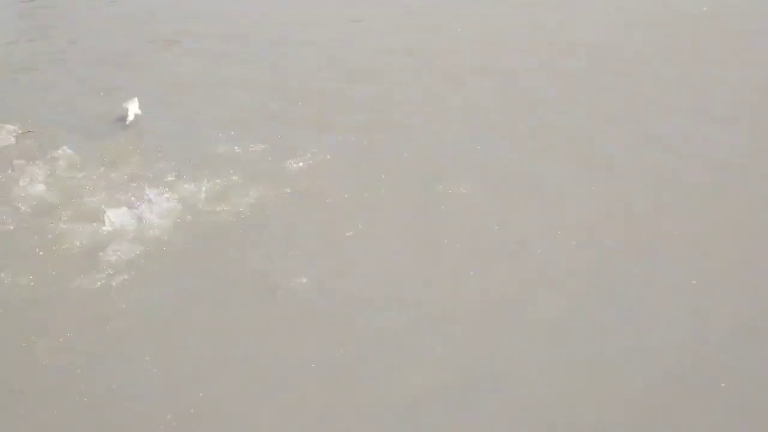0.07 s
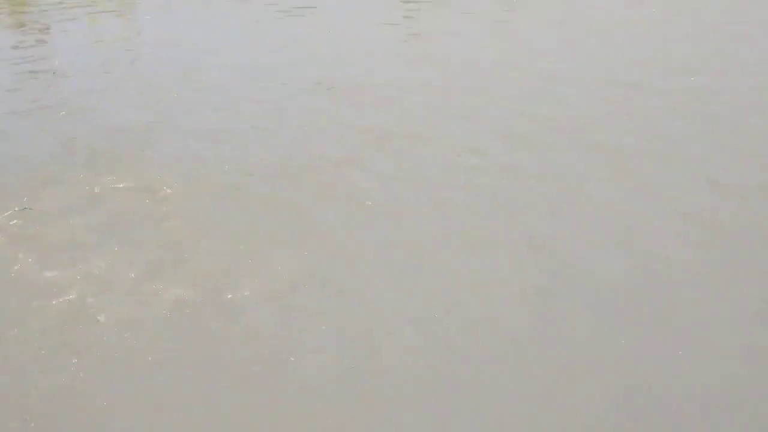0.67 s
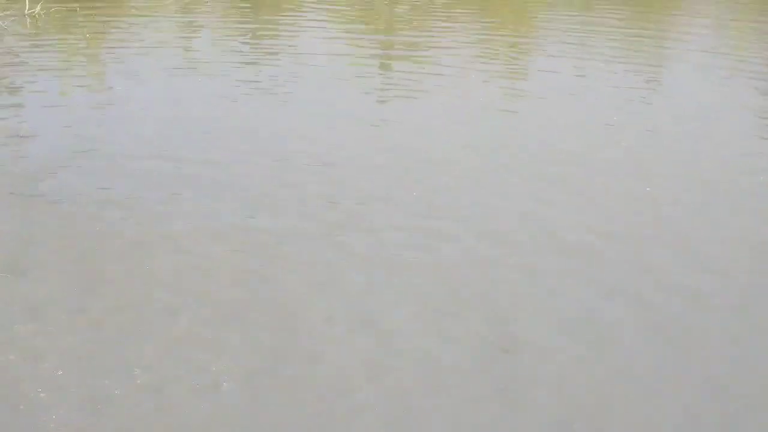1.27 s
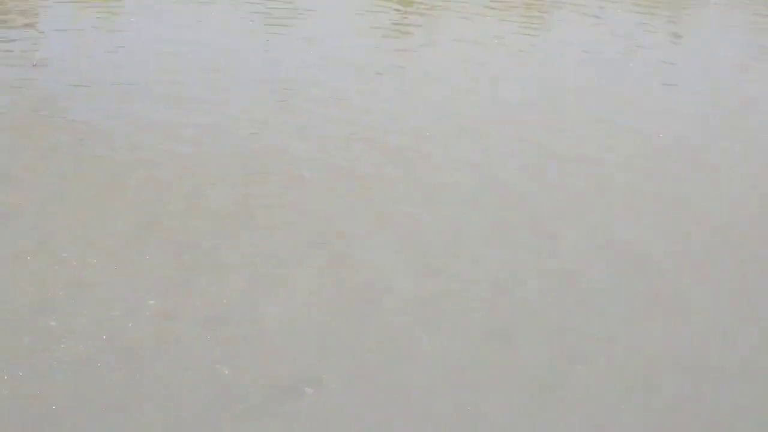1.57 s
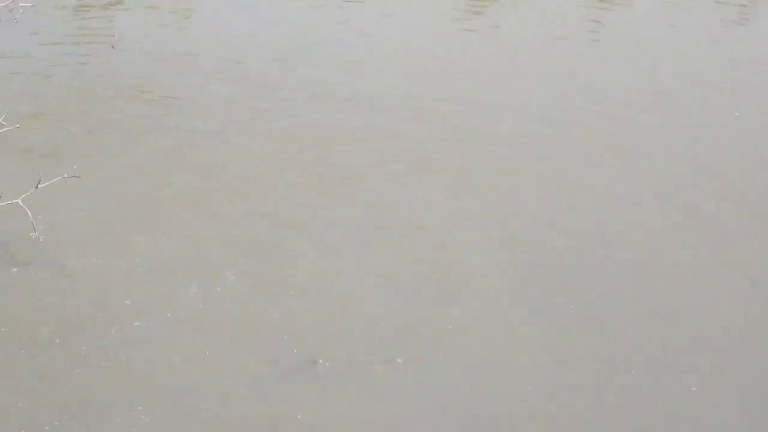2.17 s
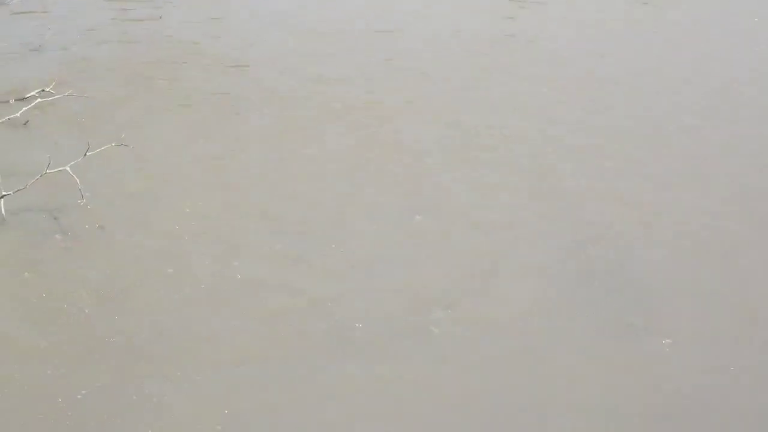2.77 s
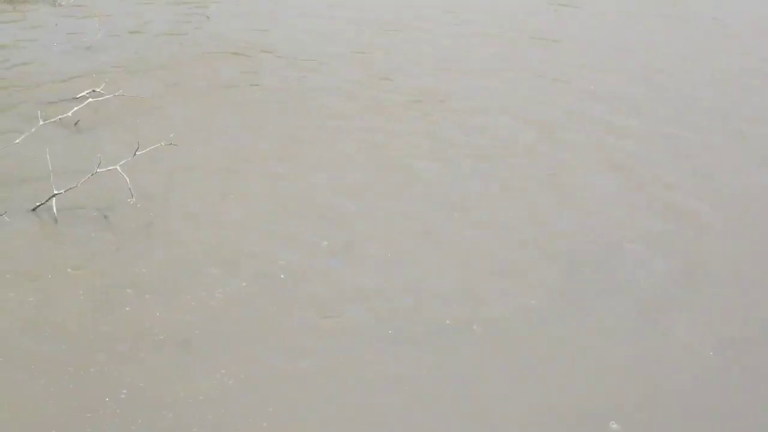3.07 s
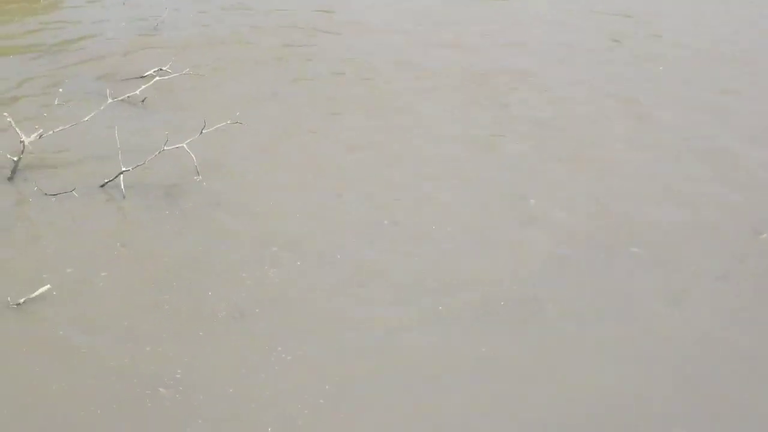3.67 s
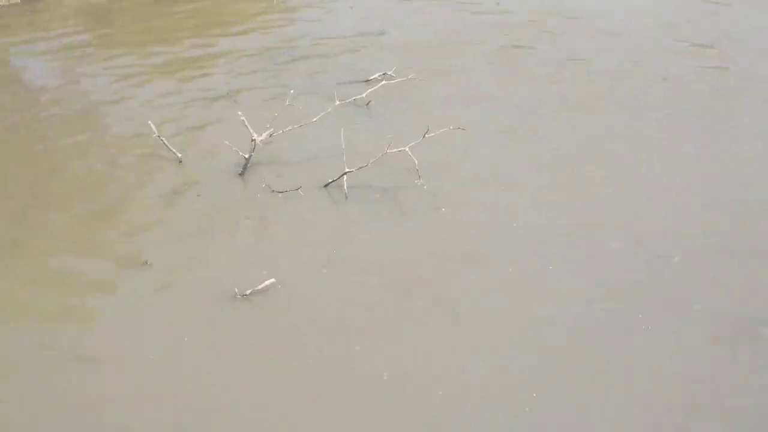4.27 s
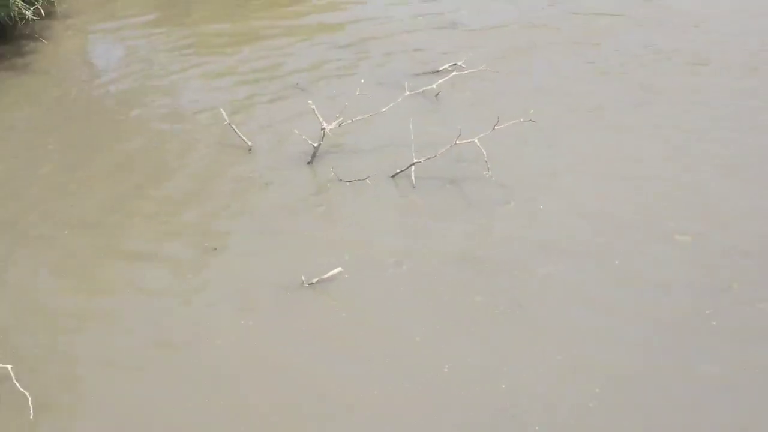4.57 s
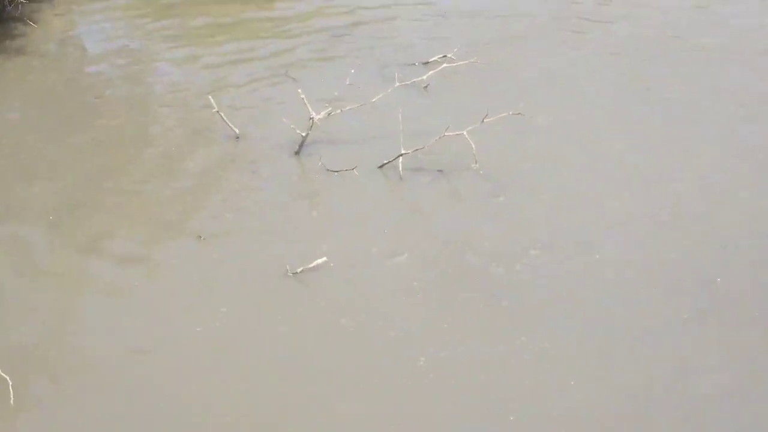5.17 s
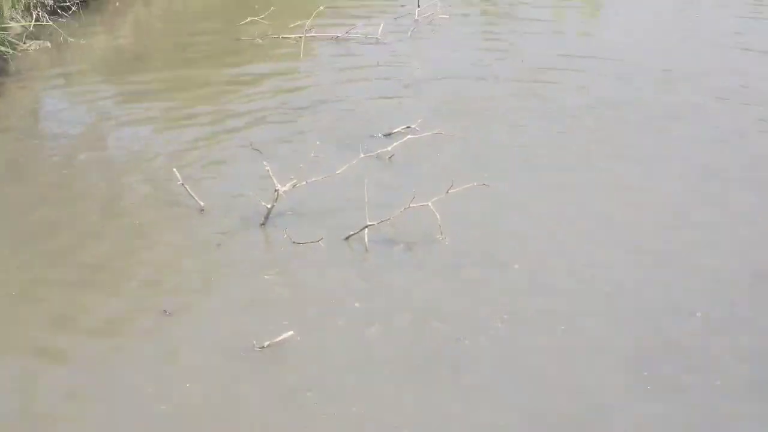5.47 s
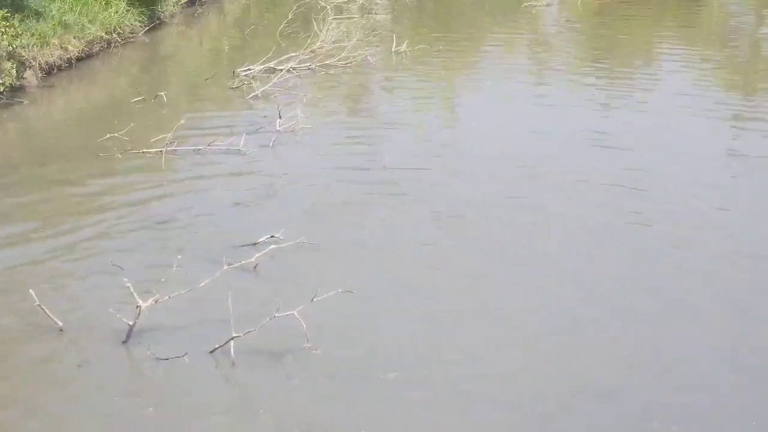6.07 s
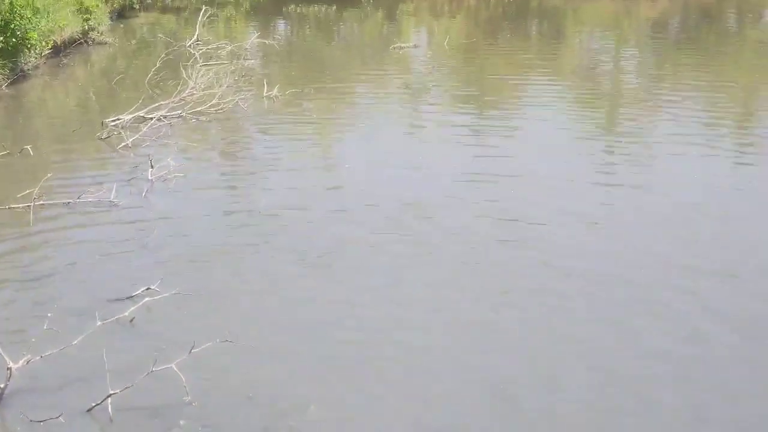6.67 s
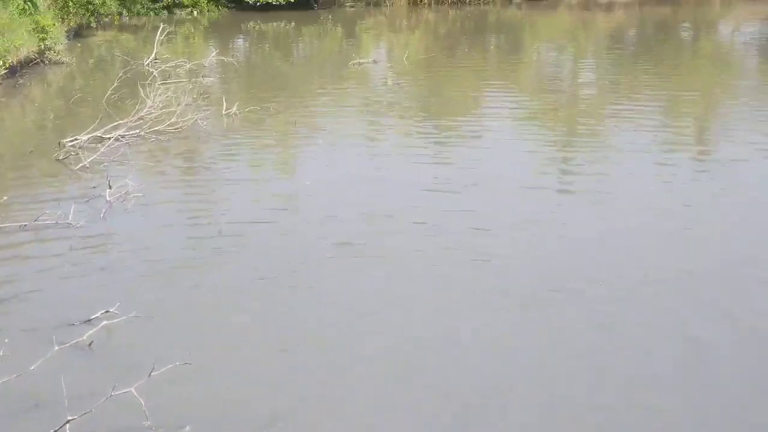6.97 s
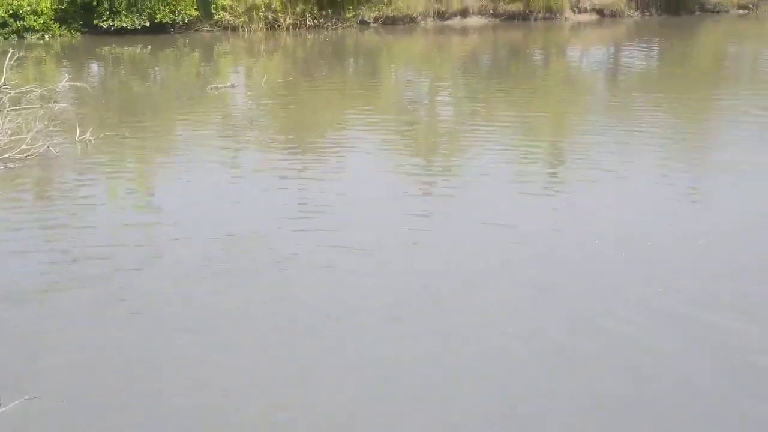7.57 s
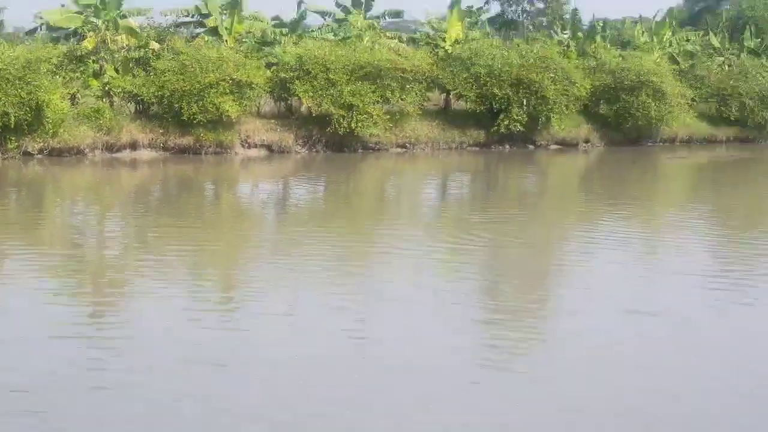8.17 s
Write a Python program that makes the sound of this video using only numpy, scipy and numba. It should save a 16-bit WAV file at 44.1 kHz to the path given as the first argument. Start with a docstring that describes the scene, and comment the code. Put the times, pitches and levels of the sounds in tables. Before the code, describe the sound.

Outdoors at a pond, water trickles and drips steadily, the drops landing in small uneven clusters with short, bright plinks over a soft wash. At the very start the tail of a splash bubbles and hisses away. Occasional plops, spatters and a faint fizz follow. Low wind rumble comes and goes on the microphone the whole time, in short irregular puffs.

```python
"""Water trickles and drips into a pond, while an opening splash dies away in bubbles and foam.
Each drop gives an impact tick and traps a bubble, which rings briefly as a damped oscillator.
Droplets fall in small clusters over a soft wash, among plops, gurgles, plinks and landing spray.
Gusts of wind buffet the small microphone with turbulent pressure; its presence peak near 2.7 kHz
is part of the water and tick spectra."""
import sys
import numpy as np
from scipy import signal
from scipy.fft import rfft, irfft, next_fast_len
from scipy.io import wavfile
from scipy.ndimage import uniform_filter1d, map_coordinates
from numba import njit

SR = 44100
rng = np.random.default_rng(int(sys.argv[2]) if len(sys.argv) > 2 else 0)


def store_pcm(level_fs):
    """Save levels as 16-bit WAV."""
    pcm = np.round(np.clip(level_fs, -1, 1) * 32767).astype(np.int16)
    wavfile.write(sys.argv[1], SR, np.atleast_2d(pcm).T)


N = 371322
TIME = np.arange(N) / SR

# decay of the splash: t/s, churn level/dB, spray level/dB
SPLASH_LEVELS = [(0, -42, -50.5), (0.14, -41.5, -47), (0.27, -46, -50), (0.47, -46.5, -56),
                 (0.62, -55.5, -60.5), (0.8, -58.5, -70), (1.2, -85, -65), (2.6, -120, -82),
                 (3.0, -120, -120)]
# slow envelopes: t/s, level/dB
FLOW_LEVELS = [(0, -58), (0.7, -49), (1.7, -50), (2.2, -50), (2.6, -47.5), (3.2, -49.5), (4.15, -51.5),
               (4.35, -47.5), (4.9, -53), (5.35, -47.5), (5.5, -53.5), (6.2, -48.5), (6.6, -50),
               (7.75, -50), (8.0, -45.5), (8.15, -51)]  # running water
FIZZ_LEVELS = [(0, -51.5), (1.1, -63.5), (2.7, -61), (3.4, -63), (5.5, -64), (6.3, -65), (6.8, -63),
               (7.4, -65.5), (8.42, -61.5)]  # foam and fine spray
BREEZE_LEVELS = [(0, -43), (0.3, -36), (0.8, -39), (1.4, -34), (1.75, -42), (2.4, -35.5), (2.65, -41),
                 (3.1, -39), (3.6, -41), (4.0, -49.5), (4.5, -38), (5.5, -53.5), (5.8, -41), (6.5, -38),
                 (6.78, -45), (7.25, -37.5), (7.4, -41.5), (8.05, -50.5), (8.42, -45.5)]  # wind pressure between gusts
# gusts at the microphone: t/s, hold/s, pressure level/dB, eddy speed relative to the breeze
GUSTS = [(0.115, 0.061, -27.5, 0.83), (0.232, 0.066, -27.5, 1), (0.47, 0.084, -30.5, 1.07),
         (0.603, 0.055, -30.5, 1.25), (0.86, 0.027, -21, 0.91), (0.918, 0.03666, -16.5, 0.87),
         (1.023, 0.094, -27, 0.87), (1.133, 0.12, -22.5, .97), (1.261, 0.037, -26, 0.86),
         (1.424, 0.19, -32.5, 1.05), (1.937, 0.067, -28, 0.95), (2.212, 0.2, -27.5, 0.88),
         (2.793, 0.17, -30.5, 0.91), (3.163, 0.079, -24.5, 1.06), (3.315, 0.023, -29, 0.87),
         (3.646, 0.12, -31, .95), (4.125, 0.047, -31.5, 0.96), (4.55, 0.11, -23.5, 0.99),
         (4.69, 0.13, -23.5, 1.27), (4.821, 0.16, -29, 1.39), (5.002, 0.13, -34, 1.06),
         (5.305, 0.022, -37, 1.14), (5.962, 0.0267, -29, 1.02), (6.049, 0.02045, -26.5, 1.1),
         (6.235, 0.017, -28, 0.85), (6.309, 0.073, -28.5, 0.96), (6.418, 0.075, -26.5, 0.92),
         (6.595, 0.029, -27, 0.84), (6.835, 0.08, -33, 0.92), (7.005, 0.037, -29.5, 0.9),
         (7.075, 0.093, -28.5, 0.86), (7.458, 0.032, -32.5, 0.86), (7.613, 0.053, -31, 0.69)]
# the loudest drops: t/s, level/dB, bubble f/Hz, relative tick level/dB
DROPS = [(0.3082, -27.5, 2400, -32), (0.488, -24.5, 2250, -39), (0.6474, -29.5, 3150, -35),
         (0.7118, -24, 2510, -33), (0.968, -21.5, 2840, -28.5), (1.291, -33, 2626, -45),
         (1.3087, -22.5, 2420, -36), (1.5884, -23, 2700, -51), (1.809, -25.5, 2715, -46),
         (1.9615, -29.5, 1932, -26), (2.0494, -23, 2677, -27.5), (2.601, -22, 2733, -57),
         (2.6433, -24, 2471, -32), (2.7033, -20, 2856, -27.5), (2.78, -24.5, 2927, -28),
         (2.821, -23, 2726, -61), (2.8761, -21.5, 2650, -34), (2.895, -24, 2669, -32.5),
         (3.5122, -22.5, 2809, -33), (3.9981, -27.5, 2563, -28.5), (4.0381, -25.5, 2514, -28),
         (4.2079, -26.5, 2518, -33), (4.801, -18.5, 1622, -32), (4.8184, -23.5, 2557, -34),
         (5.4497, -28, 2645, -45), (5.5514, -25.5, 2669, -27.5), (5.6191, -24, 2863, -57),
         (5.667, -40, 2655, -14.5), (5.7308, -13.5, 2750, -49), (5.8094, -25, 2110, -38),
         (5.915, -27, 2684, -29.5), (6.181, -31.5, 2608, -24), (6.4033, -25.5, 3124, -29),
         (6.6745, -25.5, 2331, -40), (6.8383, -37.5, 2730, -13), (6.9331, -36, 2680, -18.5),
         (7.134, -25, 2667, -42), (7.3445, -22, 2531, -34), (7.5495, -25.5, 2758, -30),
         (7.6226, -32, 2610, -29), (7.687, -29, 2390, -38), (7.8954, -23.5, 2680, -37),
         (7.9203, -27, 2560, -33), (7.9507, -27, 2609, -30), (8.2166, -23.5, 2670, -28.5),
         (8.2793, -25.5, 2460, -22), (8.294, -29, 2510, -38)]
# single bubbles: t/s, peak level/dB, starting f/Hz
PLOPS = [(0.074, -27, 2100), (0.1336, -31, 1700), (0.444, -36.5, 1120), (1.308, -30.5, 1237),
         (3.818, -35.5, 1650), (6.141, -37.5, 1093), (6.3, -33.5, 1679), (6.438, -37, 1429)]  # larger air pockets
SNAPS = [(0.1353, -21, 14900), (0.802, -25, 4800), (1.2144, -29, 4430), (3.498, -30, 4113),
         (5.667, -22.5, 4516), (5.7479, -33, 7420), (7.3535, -32, 6517), (7.9536, -24.5, 6168)]  # tiny bubbles
GURGLES = [(0.595, -53, 669), (4.630, -55, 641.6), (5.996, -53.5, 639)]  # rising bubbles
PLINKS = [(6.346, -40.5, 2248), (6.915, -48, 2347), (7.057, -43, 2366), (7.577, -30.5, 2450),
          (7.832, -33, 2593), (7.843, -40, 2058)]  # clean falling notes
# brief bursts: t/s, level/dB
WIND_FLICKS = [(0.062, -23), (0.268, -22.5), (0.632, -25.5), (0.868, -26), (0.93, -21), (3.19, -25),
               (4.791, -26), (6.365, -29.5)]  # sudden flicks of air
SPATTERS = [(1.195, -42.5), (2.332, -40.5), (3.112, -51.5), (3.305, -45.5), (3.80, -44), (4.06, -39),
            (4.237, -43.5), (4.674, -46.5), (4.86, -43), (4.993, -41), (5.268, -41), (6.772, -47)]  # handfuls of water
SPRAY_LANDINGS = [(1.213, -39), (1.773, -48), (2.753, -44), (3.674, -43), (4.898, -43), (5.304, -41.5),
                  (5.73, -42), (5.747, -42), (5.838, -42.5), (5.980, -42.5), (6.471, -39.5), (6.7, -40),
                  (8.092, -48)]  # patches of spray
# spectral densities: f/Hz, relative level/dB
CHURN_SPECTRUM = [(250, 23.5), (450, 0), (750, 2.5), (1200, 0), (2200, 0), (3200, -9), (3700, -9),
                  (5000, -24), (8000, -36)]  # churned water
FOAM_SPECTRUM = [(3000, -13.5), (6000, -14.5), (8300, -11.5), (10500, -16.5), (13000, -15.5), (15500, -6.5)]  # foam and mist
WATER_SPECTRUM = [(300, -36), (600, -23.5), (800, -13), (1300, -12), (2050, -7.5), (2450, -1), (2800, -1),
                  (3350, -14.5), (4200, -13), (5000, -23.5), (8000, -18.5), (8500, -25), (11000, -37),
                  (15500, -31)]  # trickling water
TICK_SPECTRUM = [(500, -13.5), (1500, 4.5), (2700, 11), (3400, 8), (4300, 7.5), (5000, -4.5), (7900, -1),
                 (8600, -12.5), (11500, -12.5), (15500, -11)]  # drop impacts
BUFFET_SPECTRUM = [(15, -10), (45, -1.5), (90, 2), (150, -3.5), (220, -13.5), (300, -23), (450, -38),
                   (700, -50), (1500, -86.5)]  # eddies at the microphone
FLICK_SPECTRUM = [(70, -3), (160, 3), (280, -2), (450, -19.5), (650, -30), (2000, -52)]  # flicks of air
AIR_SPECTRUM = [(15, -3.5), (45, 2.5), (90, -15), (170, -37.5), (300, -24.5), (600, -38.5), (2000, -49)]  # steady rumble of air
SPRAY_SPECTRUM = [(1500, -8), (4500, -3), (7900, -6), (8600, -15), (11500, -10), (15300, 0), (16500, -21)]  # landing spray

GUST_ATTACK_S, GUST_RELEASE_S = .011, .02  # time constants
BRIGHTENING, CALM_PRESSURE_DB = .16, -31  # dB of eddy speed per dB of pressure above this level


def undb(db):
    """Amplitude ratio of a level in decibels."""
    return 10 ** (np.asarray(db) / 20)


def unit(x):
    """Normalisation to rms 1."""
    return x / np.sqrt(np.mean(x ** 2))


def curves(table):
    """Linear interpolation in time of each column of a table."""
    s, *columns = np.transpose(table)
    return [np.interp(TIME, s, c) for c in columns]


def colour(x, spectrum):
    """Minimum-phase filter through (f/Hz, level/dB) points, built by folding the cepstrum."""
    size = 2 * next_fast_len(len(x) // 2 + 2048)
    hz, db = np.transpose(spectrum)
    bins = np.maximum(np.arange(size // 2 + 1) * SR / size, 1)
    gain = undb(np.interp(np.log(bins), np.log(hz), db))
    cepstrum = irfft(np.log(gain))
    cepstrum[1:size // 2] *= 2
    cepstrum[size // 2 + 1:] = 0
    return irfft(rfft(x, size) * np.exp(rfft(cepstrum)))[:len(x)]


def noise(spectrum):
    """Filtered Gaussian noise of rms 1."""
    return unit(colour(rng.standard_normal(N), spectrum))


def wander(per_s):
    """Random modulation of rms 1: straight ramps between Gaussian values."""
    step = int(SR / per_s)
    held = rng.standard_normal(N // 20)[np.arange(N) // step]
    return unit(uniform_filter1d(held, step))


def steady(x, seconds):
    """Division by the running rms holds the level near 1."""
    width = int(seconds * SR)
    power = uniform_filter1d(uniform_filter1d(x ** 2, width), width)
    return x / np.sqrt(power + 1e-12)


def swells(table, half_width_s):
    """A Gaussian pulse of gain at each (t/s, level/dB) row."""
    return sum(undb(db) * np.exp(-((TIME - s) / half_width_s) ** 2) for s, db in table)


def clusters(count, members, spread_s):
    """A clustered point process: arrival times scatter normally about each bunch's centre."""
    centres = (np.arange(count) + 2 * rng.random(count) - 1) / count * N / SR
    return (centres[:, None] + spread_s * rng.standard_normal((count, members))).ravel() % (N / SR)


@njit
def bubbles(start, hz, cycles, glide, peak):
    """Bubble resonance: each peaks after `cycles` periods, detuned by the share `glide`, and decays."""
    out = np.zeros(N)
    for k in range(len(start)):
        first, rise, phase = int(start[k] * SR), cycles[k] * SR / hz[k], 0.
        for i in range(max(0, -first), min(int(4 * rise), N - first)):
            age = i / rise
            phase += 2 * np.pi * hz[k] * (1 + glide[k] * age) / SR
            out[first + i] += peak[k] * age ** 2 * np.exp(2 - 2 * age) * np.sin(phase)
    return out


def bubble_cloud(start, low_hz, high_hz, cycles, spread_db):
    """Incoherent sum of bubbles of all sizes, with even energy per Hz."""
    hz = low_hz * (high_hz / low_hz) ** rng.random(len(start))
    length, slide, loud = rng.standard_normal((len(start), 3)).T
    peak = hz * undb(spread_db * np.minimum(loud, 2))
    return bubbles(start, hz, cycles * np.exp(.5 * length), 0.027 * slide, peak)


def splash():
    """Heavily damped bubbles superpose into a churn, gone within a second, under a hiss of spray."""
    churn_db, spray_db = curves(SPLASH_LEVELS)
    cloud = colour(bubble_cloud(rng.random(2600), 400, 4500, cycles=2.1, spread_db=5.5), CHURN_SPECTRUM)
    cloud /= np.std(cloud[:SR])
    churn = undb(0.5) * cloud + undb(1.0) * noise(CHURN_SPECTRUM)
    churn *= undb(churn_db + 1.5 * wander(per_s=58.3))
    return churn + noise(FOAM_SPECTRUM) * undb(spray_db)


def trickle():
    """Air entrainment: a surging stream makes clusters of ringing bubbles and snaps over a wash."""
    flow_db, = curves(FLOW_LEVELS)
    near = clusters(count=210, members=18, spread_s=0.0076)
    patter = unit(colour(bubble_cloud(near, 797, 5290, cycles=2.2, spread_db=6), WATER_SPECTRUM))
    far = rng.random(12000) * N / SR
    wash = unit(colour(bubble_cloud(far, 550, 7960, cycles=4.08, spread_db=3.5), WATER_SPECTRUM))
    spray = clusters(count=170, members=12, spread_s=0.0029)
    snaps = unit(colour(bubble_cloud(spray, 2660, 8830, cycles=0.86, spread_db=11.5), TICK_SPECTRUM))
    bed = undb(-4.5) * wash + undb(-9) * noise(WATER_SPECTRUM)
    surge_db = 1.27 * wander(per_s=20)
    return (undb(-1.5) * steady(patter, 0.12) + bed + undb(-8) * snaps) * undb(flow_db + surge_db)


def foam():
    """Small bubbles resonate high: they burst in flurries over a dense prickle and a restless mist."""
    fizz_db, = curves(FIZZ_LEVELS)
    flurries = clusters(count=190, members=12, spread_s=0.0014)
    bursts = colour(bubble_cloud(flurries, 11500, 17400, cycles=0.71, spread_db=2.5), FOAM_SPECTRUM)
    bursts = unit(bursts * undb(3.3 * wander(per_s=65)))
    singles = rng.random(5000) * N / SR
    prickle = unit(colour(bubble_cloud(singles, 5160, 18900, cycles=4.5, spread_db=10.5), FOAM_SPECTRUM))
    mist = noise(FOAM_SPECTRUM) * undb(4.5 * wander(per_s=90))
    fizz = undb(-2.5) * mist + undb(-5.5) * prickle + undb(-0.5) * bursts
    return fizz * undb(fizz_db + 4.5 * wander(per_s=22))


def airflow():
    """Pressure level and eddy speed: gusts and breeze add in power, and turbulence makes both flutter."""
    breeze_db, = curves(BREEZE_LEVELS)
    power = undb(breeze_db + 3 * wander(per_s=20)) ** 2
    weighted_speed = power.copy()
    for arrival, hold, db, eddy_speed in GUSTS:
        before, after = np.maximum(arrival - TIME, 0), np.maximum(TIME - arrival - hold, 0)
        gust = undb(db) * np.exp(-before / GUST_ATTACK_S - after / GUST_RELEASE_S)
        power += gust ** 2
        weighted_speed += eddy_speed * gust ** 2
    pressure_db = 10 * np.log10(power) + 2 * wander(per_s=42)
    return pressure_db, weighted_speed / power * undb(BRIGHTENING * (pressure_db - CALM_PRESSURE_DB))


def wind():
    """Convected turbulence: a stronger gust sweeps eddies past the microphone faster, so is brighter."""
    pressure_db, speed = airflow()
    turbulence = steady(noise(BUFFET_SPECTRUM), 0.046)
    eddies = map_coordinates(turbulence, [np.cumsum(speed) % (N - 1)], order=3, mode="wrap")
    # pressure grows with the square of the flow: pointed crests and rounded troughs
    eddies += 0.15 * (eddies ** 2 - 1)
    flicks = swells(WIND_FLICKS, half_width_s=0.0067) * steady(noise(FLICK_SPECTRUM), 0.026)
    return eddies * undb(pressure_db) + flicks + undb(-44.5) * noise(AIR_SPECTRUM)


def pops(table, cycles, second_db):
    """Pinch-off: an air pocket splits and rings with one note, then a weaker one close by."""
    s, db, hz = np.transpose(table)
    each = np.ones(len(s))
    lag, pitch = rng.random((len(s), 2)).T
    first = bubbles(s, hz, cycles * each, 0.006 * each, undb(db))
    second_hz = hz * (.7 + .5 * pitch)
    return first + bubbles(s + 0.0084 * lag, second_hz, cycles * each, 0.011 * each, undb(db + second_db))


def drops():
    """Impact and entrainment: a drop tears the surface with a crackle and traps a ringing bubble."""
    s, db, hz, tick_db = np.transpose(DROPS)
    cycles = np.clip(0.5 - 0.059 * tick_db, 1, 12)  # the harder the tick, the shorter the ring
    notes = bubbles(s, hz, cycles, np.full(len(s), .01), undb(db - 4))
    # weaker droplets land just before and after the main drop
    for lag, pitch in rng.random((4, 2, len(s))):
        droplet_hz = hz * (0.857 + .22 * pitch)
        notes += bubbles(s - .01 + 0.036 * lag, droplet_hz, cycles, np.zeros(len(s)), undb(db - 25.5))
    hits = np.bincount(((s + 0.00115) * SR).astype(int), undb(db + tick_db + 25.5), N)
    age = TIME[:N // 500] / .0013
    crackle = signal.lfilter(age * np.exp(1 - age), 1, hits) * rng.standard_normal(N)
    return notes + colour(hits + undb(-12.5) * crackle, TICK_SPECTRUM)


def gurgles(cycles=15., glide=.47):
    """The resonance of a bubble climbs quickly as it nears the surface."""
    s, db, hz = np.transpose(GURGLES)
    return bubbles(s, hz, np.full(len(s), cycles), np.full(len(s), glide), undb(db))


def spatters():
    """A handful of water lands, and its bubble notes superpose into a short, soft rush."""
    times = rng.random(6000) * N / SR
    cloud = colour(bubble_cloud(times, 1173, 4580, cycles=2.7, spread_db=8), WATER_SPECTRUM)
    return steady(cloud, 0.03) * swells(SPATTERS, half_width_s=0.018)


def spray_crackles(rise_s=0.0014):
    """Impact noise: a patch of spray lands in a bright, broadband burst of a few milliseconds."""
    s, db = np.transpose(SPRAY_LANDINGS)
    age = TIME[:N // 400] / rise_s
    landings = np.bincount((s * SR).astype(int), undb(db), N)
    return signal.lfilter(age * np.exp(1 - age), 1, landings) * noise(SPRAY_SPECTRUM)


def plinks(cycles=5.1, glide=-0.072):
    """Freely oscillating bubbles give clean notes that slide down in pitch as they fade."""
    s, db, hz = np.transpose(PLINKS)
    return bubbles(s, hz, np.full(len(s), cycles), np.full(len(s), glide), undb(db))


def banks(x, t60_s, wet_db):
    """Scattering from rippled water and grassy banks adds a faint, very short tail."""
    age = TIME[:N // 60]
    tail = rng.standard_normal(len(age)) * np.exp(-np.log(1000) * age / t60_s) * (age > .002)
    return x + undb(wet_db) * signal.fftconvolve(x, tail / np.linalg.norm(tail))[:N]


def scene():
    """Superposition of water and wind at one microphone."""
    events = drops() + plinks() + gurgles() + spatters() + spray_crackles()
    events += pops(PLOPS, cycles=1.3, second_db=-2)
    events += pops(SNAPS, cycles=0.78, second_db=-1.5)
    water = banks(trickle() + events, t60_s=0.028, wet_db=-11)
    return (water + foam() + splash() + wind())[None]


def record(dry):
    """Band limiting: the recorder's steep low-pass filter cuts the top above 15.9 kHz."""
    return signal.sosfilt(signal.ellip(10, .2, 70, 15900, fs=SR, output="sos"), dry)


dry = scene()
out = record(dry)
store_pcm(out)
```